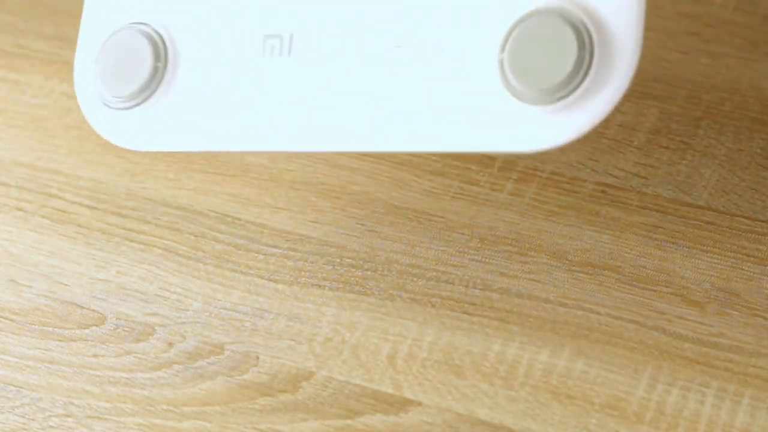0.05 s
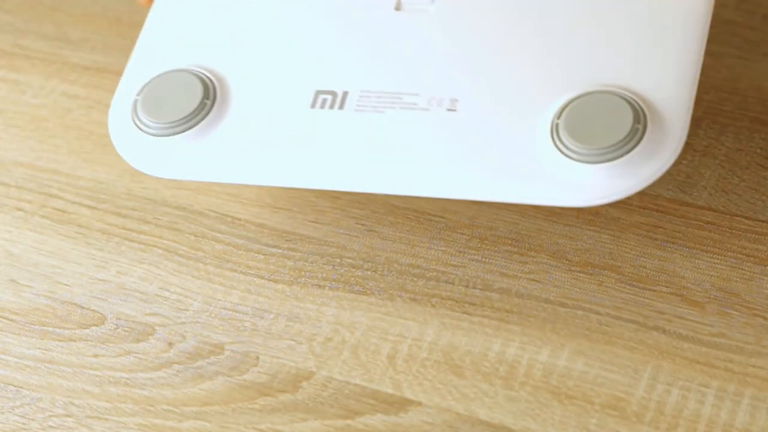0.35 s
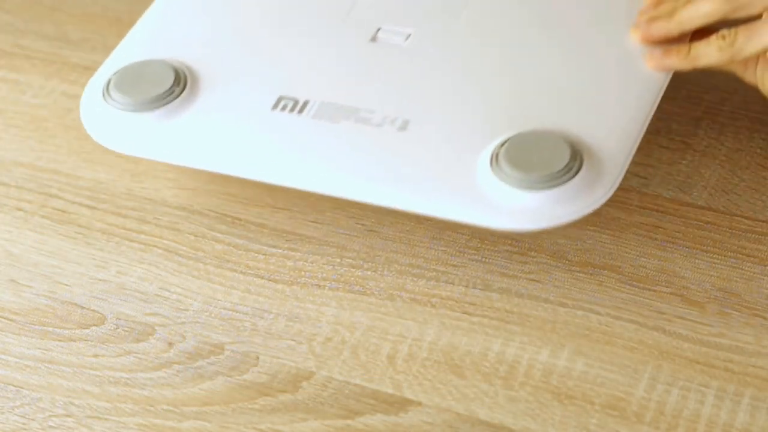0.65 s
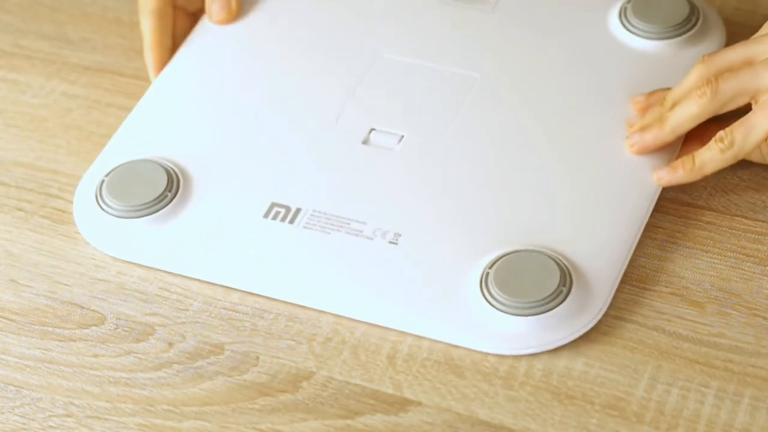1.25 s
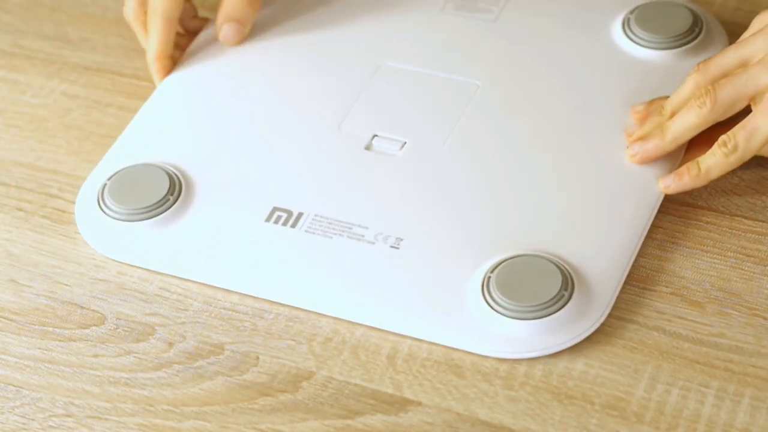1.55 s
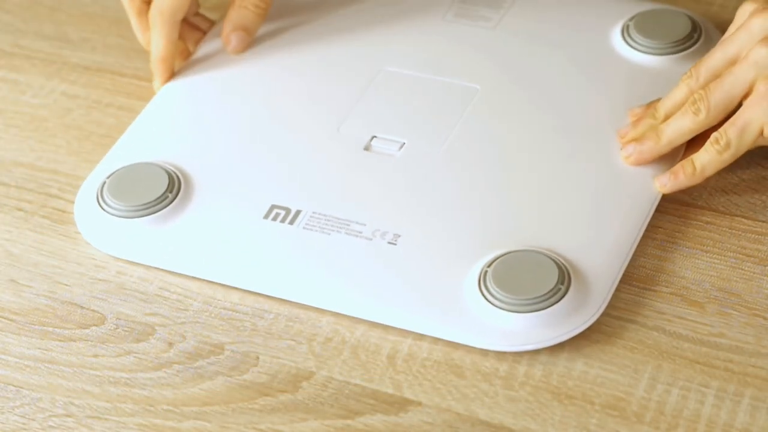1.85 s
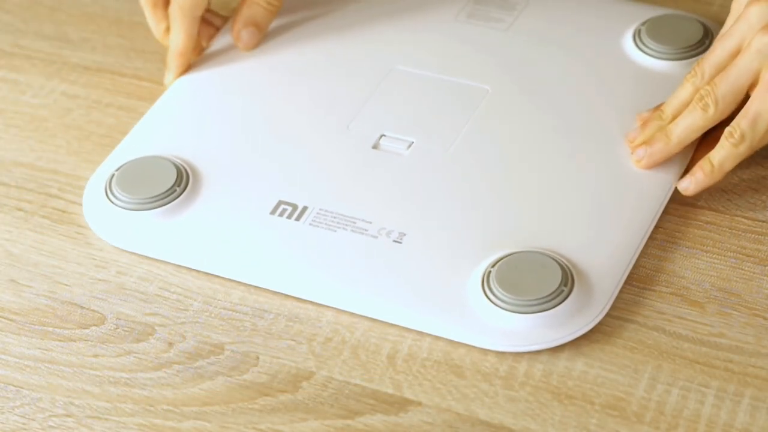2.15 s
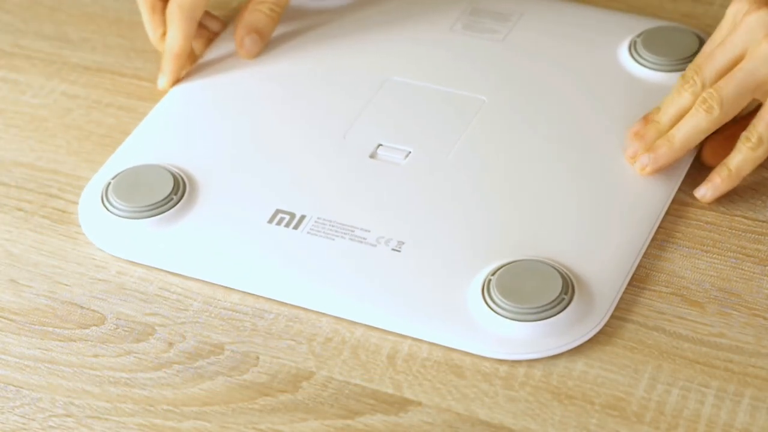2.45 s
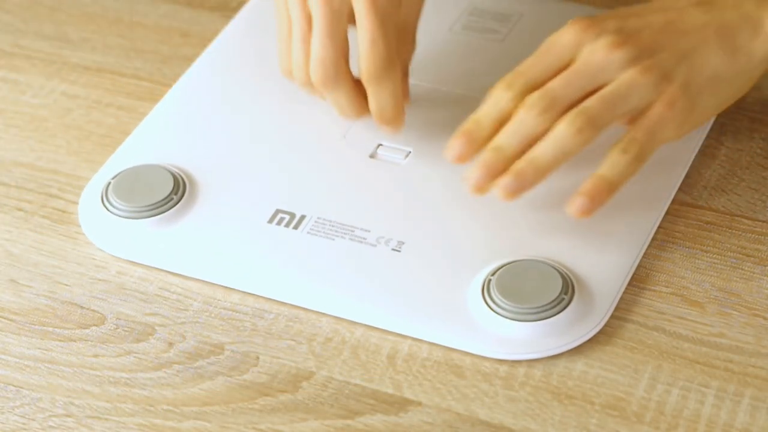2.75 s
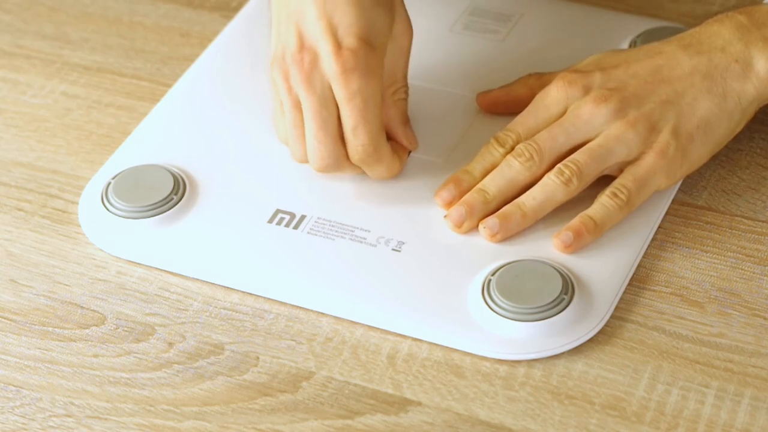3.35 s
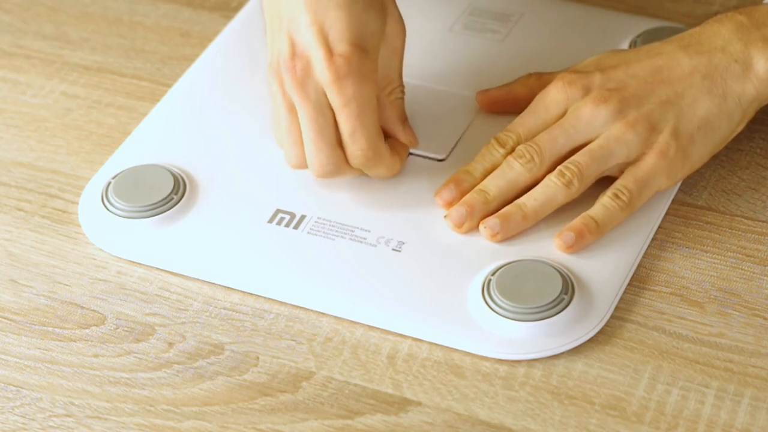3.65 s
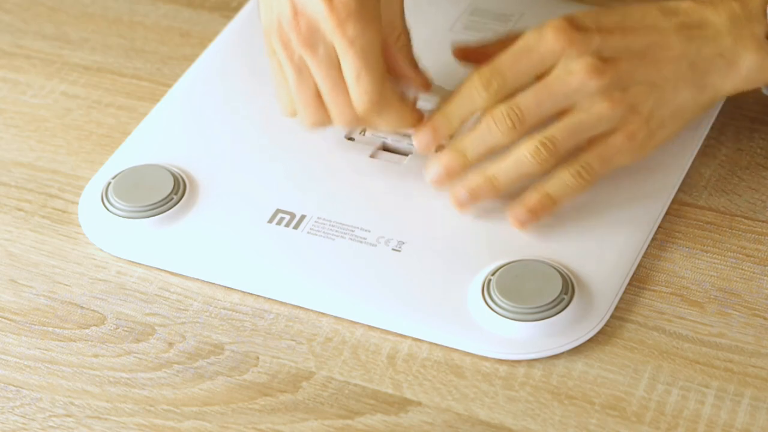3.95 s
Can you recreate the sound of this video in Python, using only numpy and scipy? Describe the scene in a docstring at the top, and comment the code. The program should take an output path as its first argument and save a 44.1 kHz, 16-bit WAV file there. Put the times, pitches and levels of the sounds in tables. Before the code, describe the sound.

Hollow knocks and a brief clatter sound as a plastic scale is lowered onto a wooden tabletop in a small, quiet room. Light finger ticks follow, then a sharp latch snap and short rasps of the battery cover sliding free.

```python
"""Hands brush and tick over a plastic bathroom scale as it is lowered face down onto a wooden table.
Two corners knock, then it drops flat and chatters: each hit clacks the shell, rings the body and booms
the table top. Fingers slide, tap and press, the battery cover's latch snaps open and the cover scrapes
out of its seat. A small, quiet room answers each blow, over a faint steady hiss."""
import sys
import numpy as np
from scipy import signal
from scipy.fft import rfft, irfft
from scipy.io import wavfile
from scipy.ndimage import uniform_filter1d

SR = 44100
rng = np.random.default_rng(int(sys.argv[2]) if len(sys.argv) > 2 else 0)


def waveform_to_disk(signal):
    """Save audio, clipped to [-1, 1], as 16-bit WAV at the path in sys.argv[1]."""
    frames = np.transpose(np.atleast_2d(signal))
    scaled = np.clip(frames, -1, 1) * 32767
    samples = np.round(scaled).astype(np.int16)
    wavfile.write(sys.argv[1], SR, samples)


N = 176400
EVENT_SAMPLES = 32768
T = np.arange(EVENT_SAMPLES) / SR  # seconds within one event

# boom of the wooden table top: pitch_hz, level_db, t60_ratio (times the boom's decay time)
TABLE_MODES = [(61.4, -11, 1.6), (77, -4.5, 1.22), (142.8, 6, 0.82), (155.9, -4, 1.02), (207.3, -9, 1.13)]
# ring of the scale's body: pitch_hz, level_db, t60_s
BODY_MODES = [(272.6, -10.5, 0.3), (313.5, -4, 0.14), (360.6, 0.5, 0.24), (427, -1.5, .22),
              (479, -6.5, 0.18), (499, -2, 0.27), (566.9, -1, 0.22), (652, -4.5, 0.18), (1041, -5, 0.2),
              (1130, -4, 0.17), (1312, -8.5, 0.15), (1580, -6.5, 0.17), (1978, -12, 0.35)]


def amp(db):
    """Decibels to gain."""
    return 10 ** (np.asarray(db) / 20)


def unit(x):
    """Scale to an energy of one."""
    return x / np.sqrt(np.sum(x ** 2) + 1e-18)


def fade(t60_s):
    """Exponential decay, 60 dB down after t60_s."""
    return np.exp(-np.log(1000) * T / max(t60_s, 1e-4))


def add(track, start_s, sound):
    """Mix a sound into the track."""
    i = int(np.clip(start_s * SR, 0, N - 1))
    track[i:i + len(sound)] += sound[:N - i]


def along(curve, hz):
    """Read a curve of (freq_hz, value) points on a log-frequency axis."""
    freq_hz, values = np.array(curve, float).T
    return np.interp(np.log(np.maximum(hz, 1)), np.log(freq_hz), values)


def colour(x, eq, tilt_db_per_oct=0, tilt_from_hz=610):
    """EQ curve plus treble tilt; white noise keeps its power."""
    n = len(x)
    hz = np.arange(n + 1) * SR / (2 * n)
    gain = amp(along(eq, hz) + tilt_db_per_oct * np.log2(np.maximum(hz, tilt_from_hz)))
    gain /= np.sqrt(np.mean(gain ** 2))
    # minimum phase, so nothing rings ahead of an attack
    cepstrum = irfft(np.log(gain))
    cepstrum[1:n] *= 2
    cepstrum[n + 1:] = 0
    return irfft(rfft(x, 2 * n) * np.exp(rfft(cepstrum)))[:n]


def dense_ring(t60_at, attack=1):
    """Countless close modes: half-octave noise bands, each dying at its own rate; flat overall."""
    hz = np.arange(EVENT_SAMPLES // 2 + 1) * SR / EVENT_SAMPLES
    spectrum = rfft(rng.standard_normal(EVENT_SAMPLES))
    out = 0
    for low_hz in 62.5 * 2 ** (np.arange(17) / 2):
        band = irfft(spectrum * ((hz >= low_hz) & (hz < low_hz * np.sqrt(2))))
        out += np.sqrt(low_hz) * unit(band * attack * fade(t60_at(low_hz)))
    return unit(out)


def modes(rows, t60_scale=1, tilt_db_per_oct=0, polarity=1):
    """Decaying sines set off by one blow; with polarity -1, neighbours swing in opposite directions."""
    out = 0
    for k, (pitch_hz, level_db, t60) in enumerate(rows):
        gain = polarity ** k * amp(level_db + tilt_db_per_oct * np.log2(pitch_hz))
        out += gain * np.sin(2 * np.pi * pitch_hz * T) * fade(t60 * t60_scale)
    return unit(out)


def plastic_hit(t60_at_1khz_s, treble_damping, crack_db):
    """A contact spike and crack, then the short, dense ring of plastic, its treble dying first."""
    spike = T == 0
    burst = unit(rng.standard_normal(EVENT_SAMPLES) * fade(t60_s=0.0043) * (T > 0))
    ring = dense_ring(lambda hz: t60_at_1khz_s * (1000 / hz) ** treble_damping)
    return unit(amp(crack_db) * unit(spike + burst) + ring)


def friction(strokes, eq):
    """Rubbing hiss that swells and fades with each stroke, catching unevenly every few milliseconds."""
    out = np.zeros(N)
    to_unit_rms = np.sqrt(EVENT_SAMPLES)
    for peak_s, half_length_s, level_db, tilt_db_per_oct, roughness_db in strokes:
        grip = unit(uniform_filter1d(rng.standard_normal(EVENT_SAMPLES), size=130)) * to_unit_rms
        grain = rng.standard_normal(EVENT_SAMPLES) * amp(roughness_db * grip)
        hiss = unit(colour(grain, eq, tilt_db_per_oct)) * to_unit_rms
        start_s = max(peak_s - T[-1] / 2, 0)
        swell = np.exp(-((T + start_s - peak_s) / half_length_s) ** 2)
        add(out, start_s, amp(level_db) * hiss * swell)
    return out


def room_tone(level_db=-60.5):
    """A faint, dark bed of steady hiss."""
    # colour of the quiet room: freq_hz, level_db
    air_eq = [(25, -10), (107, -11.5), (144, -8.5), (220, -8), (290, -10.5), (360, -5.5), (445, -11),
              (700, -5), (1100, -11.5), (1600, -19.5), (3000, -22), (4100, -18), (4900, -21.5), (7000, -22),
              (7900, -19), (9000, -25), (12000, -27.5), (15500, -29)]
    return amp(level_db) * colour(rng.standard_normal(N), air_eq)


def hand_slides():
    """Skin and plastic brush softly over the shell."""
    # brushing strokes: peak_s, half_length_s, level_db, tilt_db_per_oct, roughness_db
    strokes = [(.14, 0.14, -55.5, 2.7, 2), (0.357, 0.036, -59.5, 3.5, 0), (.556, 0.022, -59, 0.5, 2.5),
               (.62, 0.091, -66, -1, 7), (1.24, 0.035, -54.5, -1.5, 1), (1.335, 0.069, -56.5, 0, 2.5),
               (1.466, 0.016, -50.5, 0, 1), (1.508, 0.075, -56.5, 1, 3.5), (1.661, 0.11, -57, -1.5, -0.5),
               (1.88, 0.15, -52, -1, 0.5), (2.132, 0.11, -65.5, -2.5, 2), (2.56, 0.28, -67.5, 3, 2),
               (2.707, 0.036, -61.5, 0.5, 7), (2.83, 0.051, -57, -4, 6), (2.993, 0.019, -60.5, 4, 4),
               (3.14, 0.017, -61, -9, 0), (3.205, 0.013, -62, -8, 6), (3.435, 0.023, -61.5, -7.5, 6.5)]
    # colour of skin on plastic: freq_hz, level_db
    skin_eq = [(200, -9.5), (700, 3), (1500, -4), (3500, -7), (6000, -3.5), (7800, 0), (9200, -6.5),
               (11000, -10), (15500, -25)]
    return friction(strokes, skin_eq)


def shell_ticks():
    """Fingers and loose plastic make light, bright contacts on the shell."""
    # light taps: start_s, level_db, tilt_db_per_oct
    taps = [(0.303, -26, -0.5), (0.694, -35, 0), (1.441, -18, 4), (1.449, -20.5, -6), (1.554, -19.5, 1),
            (1.635, -18.5, 3.5), (2.296, -12, 6), (2.333, -24, 16), (2.424, -24.5, 7), (2.670, -26.5, 4.5),
            (2.781, -20, 0.5), (2.818, -18, 5), (2.857, -30, -1.5), (3.16, -38, 2), (3.45, -36.5, 3),
            (3.692, -32, 0), (3.835, -31, 5), (3.735, -23, -5.5), (3.765, -23.5, -4.5), (3.8608, -17, -3.5),
            (3.9083, -13.5, -2.5), (3.9403, -20, 0.5)]
    # colour of a tick: freq_hz, level_db
    tick_eq = [(150, -18), (600, -8), (2000, -1.5), (3300, -5), (5800, 2), (8000, 3), (9000, -7.5),
               (10500, -4.5), (12000, -19), (15500, -23)]
    out = np.zeros(N)
    for start_s, level_db, tilt_db_per_oct in taps:
        tick = plastic_hit(t60_at_1khz_s=0.048, treble_damping=0.37, crack_db=-9.5)
        add(out, start_s, amp(level_db) * colour(tick, tick_eq, tilt_db_per_oct))
    return out


def table_knocks():
    """Each landing clacks the shell, booms the table top and rings the scale's body."""
    # two corners, then the drop and its chatter:
    # start_s, clack_db, clack_tilt_db_per_oct, boom_db, boom_t60_s, ring_db, ring_tilt_db_per_oct
    landings = [(1.069, -16.5, 0, -20, .3, -46, -5), (1.072, -6.5, -3.1, -3, .5, -17, 8),
                (1.0773, -12.5, -2, -7, 0.67, -26, -3), (1.0991, -11.5, -3, -11.5, .4, -27, -12),
                (1.110, -19, -3, -20, 0.2, -21, -15), (1.520, -12, 0.8, -9, .3, -30, -20),
                (1.525, -18.5, -6, -6.5, 0.44, -10.5, -14.5), (1.551, -26, -17, -9.5, 0.16, -18.5, -10),
                (1.635, -21, -3.5, -26, 0.13, -22, -4.5), (2.1956, -15, 1.5, -2.5, 0.62, -11, 1.5),
                (2.2308, 3.5, 2, -2.5, 0.16, 1.5, 1), (2.234, 1.5, 0.5, -12, 0.39, 1.5, -6.5),
                (2.2509, -1, -6.5, -10, 0.28, -5, -4), (2.256, -0.5, -4, -25, 0.22, -9, -11),
                (2.297, -5.5, -5.5, -10, 0.2, -9, 0), (2.324, -3.5, -9, -17, 0.25, -5.5, -9.5)]
    # colour of the shell's clack: freq_hz, level_db
    clack_eq = [(60, -7), (210, -0.5), (300, -6), (480, -1.5), (830, 0), (1150, 1), (1850, -4), (2500, -3),
                (3300, -8.5), (6000, -7.5), (8000, -8), (9300, -15), (10500, -15.5), (15500, -36)]
    out = np.zeros(N)
    for start_s, clack_db, clack_tilt, boom_db, boom_t60_s, ring_db, ring_tilt in landings:
        hit = plastic_hit(t60_at_1khz_s=0.075, treble_damping=0.4, crack_db=-10)
        clack = amp(clack_db) * colour(hit, clack_eq, clack_tilt)
        boom = amp(boom_db) * modes(TABLE_MODES, boom_t60_s)
        ring = amp(ring_db) * modes(BODY_MODES, tilt_db_per_oct=ring_tilt, polarity=-1)
        add(out, start_s, clack + boom + ring)
    return out


def finger_presses(boom_t60_s=0.23, attack_s=0.018):
    """Fingertips lean on the shell; the slow push stirs only a faint low boom from the table."""
    # soft pushes: start_s, level_db
    pushes = [(1.975, -20), (2.859, -22), (3.31, -25.5), (3.424, -21.5), (3.86, -23)]
    boom = modes(TABLE_MODES, boom_t60_s) * (1 - np.exp(-T / attack_s))
    out = np.zeros(N)
    for start_s, level_db in pushes:
        add(out, start_s, amp(level_db) * boom)
    return out


def latch_snap(cover_db=-21.5, body_db=-30):
    """A sharp double snap that leaves the cover ringing and faintly stirs the scale's body."""
    # the latch lets go, then strikes its stop: start_s, level_db, tilt_db_per_oct
    snaps = [(3.5887, 4, 2.5), (3.591, 3.5, 0)]
    # colour of a snap: freq_hz, level_db
    snap_eq = [(100, -23), (400, -10), (1000, -11.5), (1400, -4.5), (1850, -0.5), (2270, -10.5),
               (2650, -4.5), (3250, -4), (3950, -1.5), (5000, -5), (6550, 0), (7250, -1.5), (8200, 0),
               (9150, -8.5), (10600, -3), (11300, -11), (13000, -14.5), (15500, -28)]
    # ring of the battery cover: pitch_hz, level_db, t60_s
    cover_modes = [(1640, -8, 0.096), (1845, -8, 0.087), (2770, -3, 0.12), (4056, 15, 0.065),
                   (4160, -1, .16), (4355, -5, 0.16), (6550, -2, .08), (8140, -3, 0.089)]
    ring = amp(cover_db) * modes(cover_modes) + amp(body_db) * modes(BODY_MODES, tilt_db_per_oct=1)
    out = np.zeros(N)
    for start_s, level_db, tilt_db_per_oct in snaps:
        hit = plastic_hit(t60_at_1khz_s=0.062, treble_damping=0.44, crack_db=0)
        snap = colour(hit, snap_eq, tilt_db_per_oct)
        add(out, start_s, amp(level_db) * (snap + ring))
    return out


def cover_scrapes():
    """The battery cover rubs out of its seat in short, bright rasps."""
    # scraping strokes: peak_s, half_length_s, level_db, tilt_db_per_oct, roughness_db
    strokes = [(3.76, 0.072, -56, -2.5, 3.5), (3.875, .02, -51, -3.5, 3.5), (3.915, 0.012, -42, 0, 0),
               (3.936, 0.0084, -36, 0, 4.5), (3.975, 0.028, -60, 0.5, 3)]
    # colour of the sliding cover: freq_hz, level_db
    scrape_eq = [(200, -4), (600, -5.5), (1400, -5), (1870, -2), (2550, 3), (3200, -5), (4000, -2),
                 (4700, -4), (6350, 1.5), (6900, -6), (7550, 1.5), (8200, 2), (8800, -7), (11000, -9),
                 (15500, -25)]
    return friction(strokes, scrape_eq)


def room_reverb(x, tail_db=-8, build_s=0.004, wall_db=-26, wall_delay_s=0.028):
    """A diffuse tail that builds up quickly, and one scattered reflection off a near wall."""
    # decay of the small room: freq_hz, t60_s
    decay = [(100, 0.51), (700, 0.5), (2000, 0.42), (5000, 0.36), (8000, .31), (14000, 0.2)]
    # colour of the reverb: freq_hz, level_db
    reverb_eq = [(60, -28), (200, -7), (380, -3), (600, -1.5), (2000, 2), (5000, -2), (9000, -3.5),
                 (15000, -4)]
    tail = dense_ring(lambda hz: along(decay, hz), attack=1 - np.exp(-T / build_s))
    scatter = unit(rng.standard_normal(EVENT_SAMPLES) * fade(t60_s=0.026))
    slap = np.roll(scatter, int(wall_delay_s * SR))
    response = colour(amp(tail_db) * tail + amp(wall_db) * slap, reverb_eq)
    return signal.fftconvolve(x, response)[:N]


def scene(low_cut_hz=60):
    """Mono mix with room tone and reverb; a low cut takes the deep bass out of contacts and rubbing."""
    contacts = table_knocks() + shell_ticks() + latch_snap() + finger_presses()
    rubbing = hand_slides() + cover_scrapes()
    low_cut = signal.butter(4, low_cut_hz, "high", fs=SR, output="sos")
    direct = signal.sosfilt(low_cut, contacts + rubbing)
    return (direct + room_tone() + room_reverb(direct))[None]


def record(dry):
    """A steep high cut takes off the very top."""
    high_cut_hz = 15750
    return signal.sosfilt(signal.ellip(10, .2, 80, high_cut_hz, fs=SR, output="sos"), dry)


dry = scene()
out = record(dry)
waveform_to_disk(out)
```